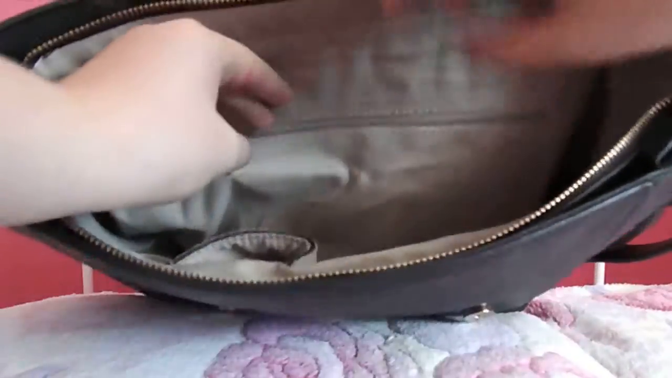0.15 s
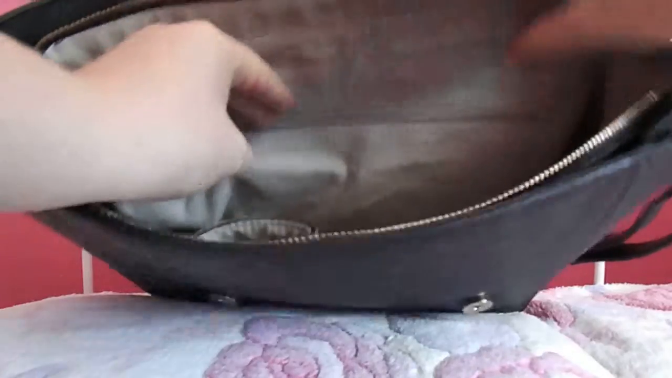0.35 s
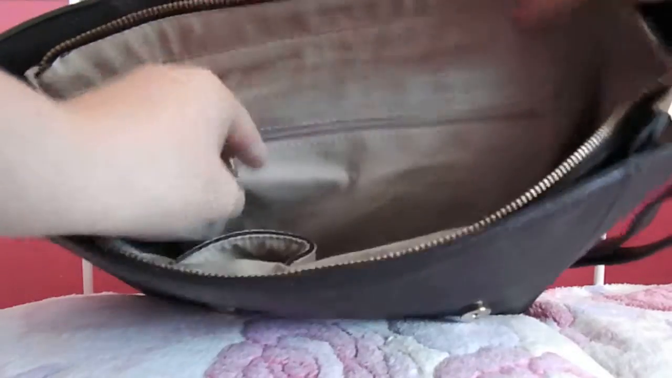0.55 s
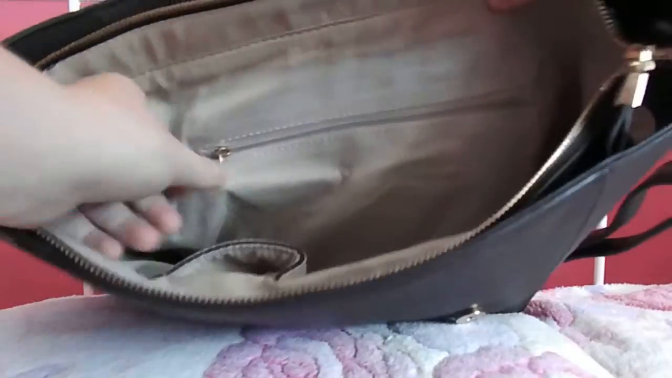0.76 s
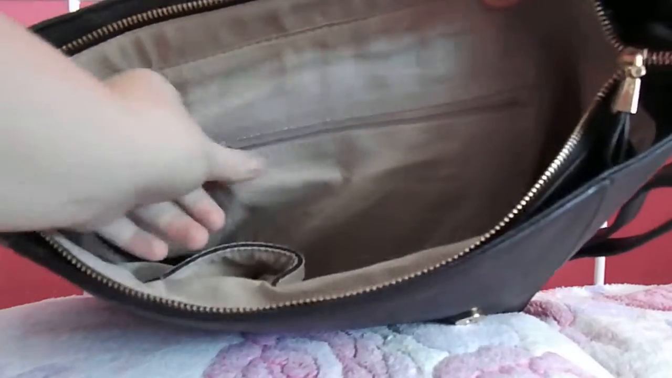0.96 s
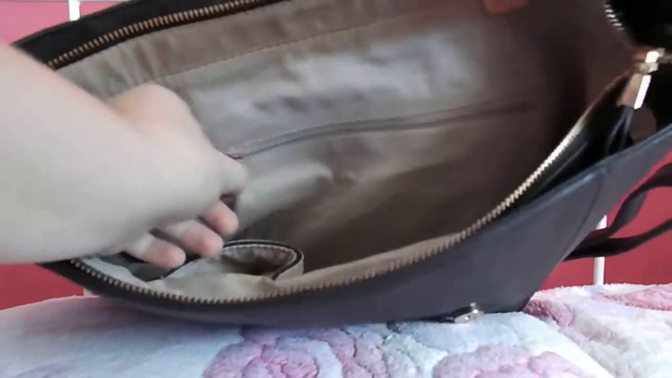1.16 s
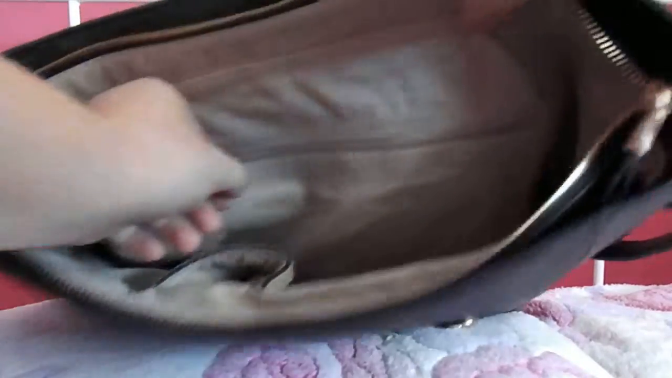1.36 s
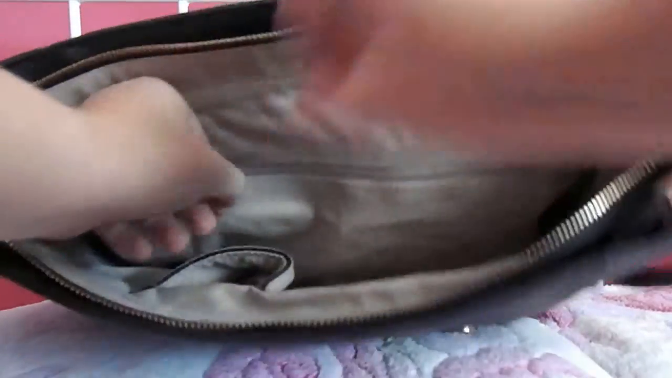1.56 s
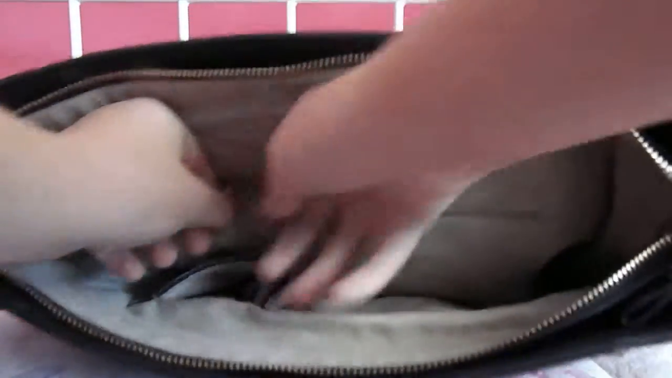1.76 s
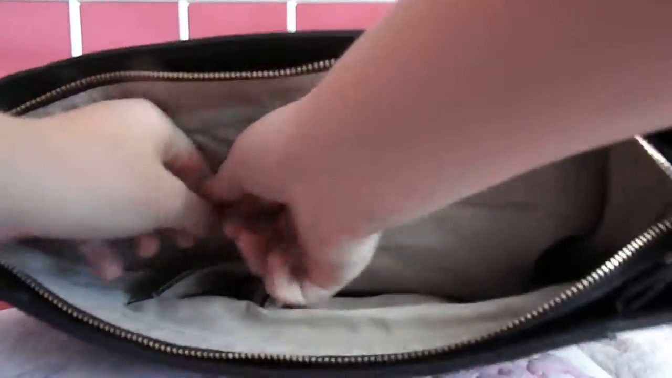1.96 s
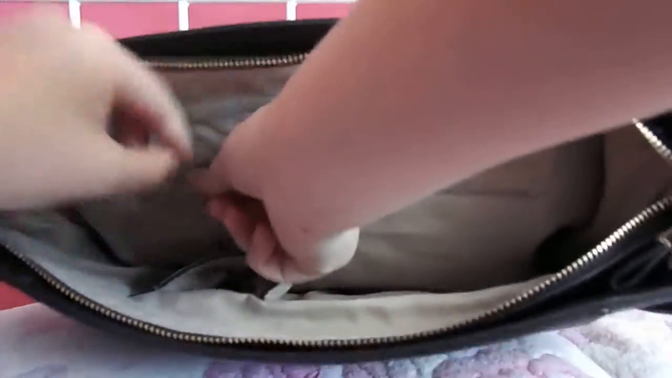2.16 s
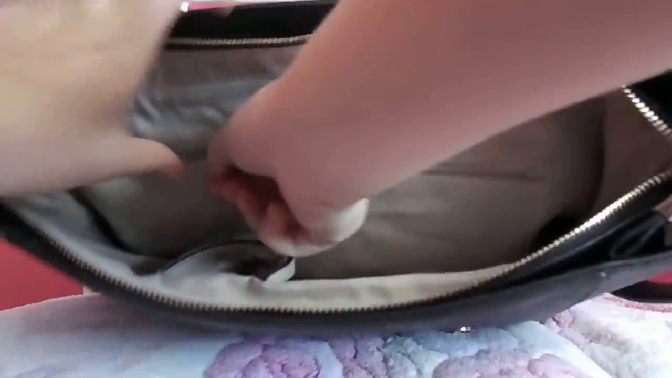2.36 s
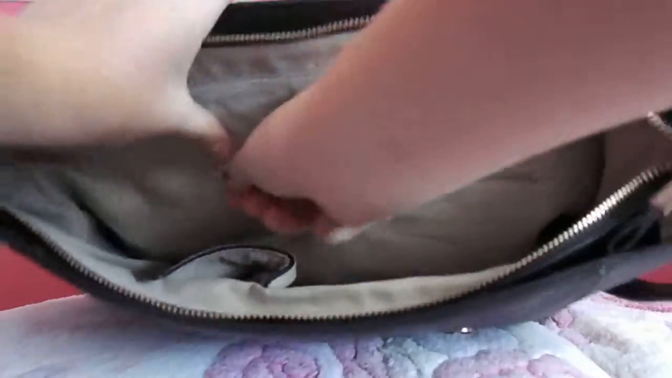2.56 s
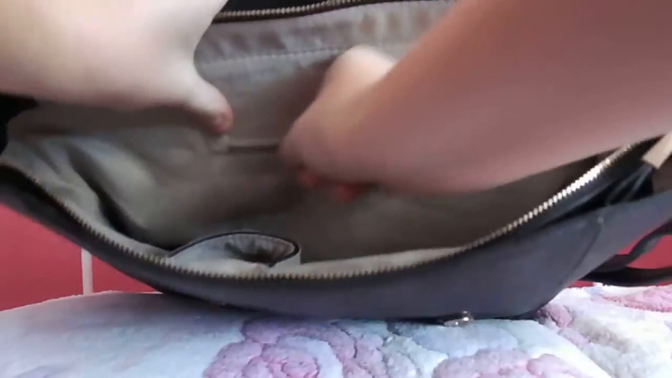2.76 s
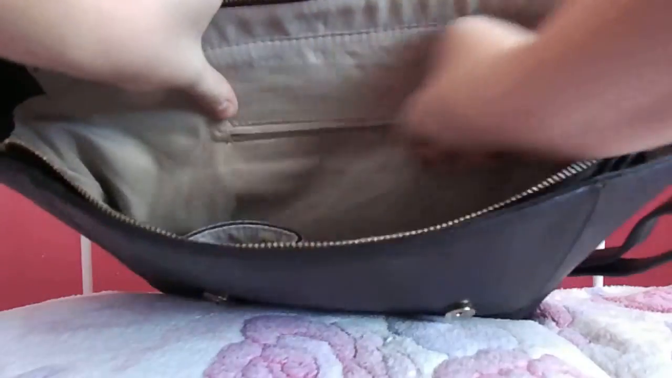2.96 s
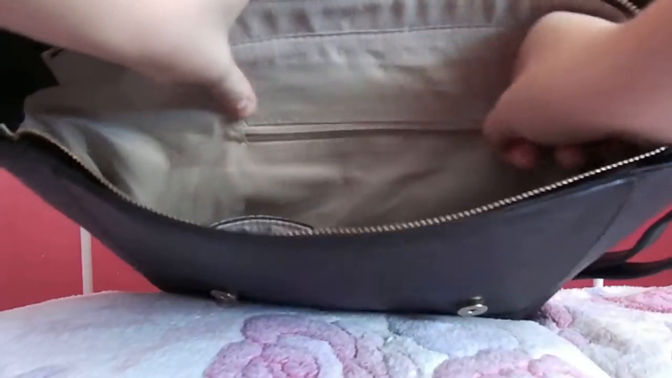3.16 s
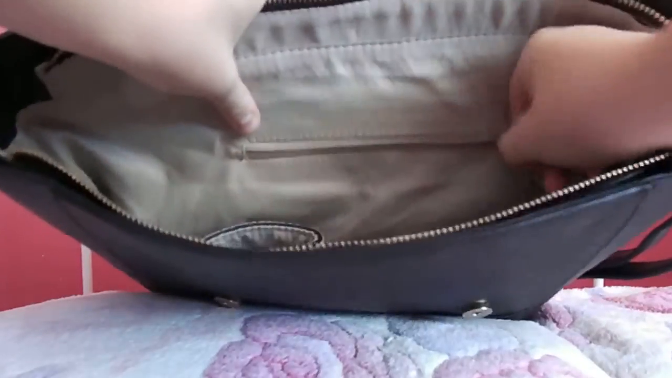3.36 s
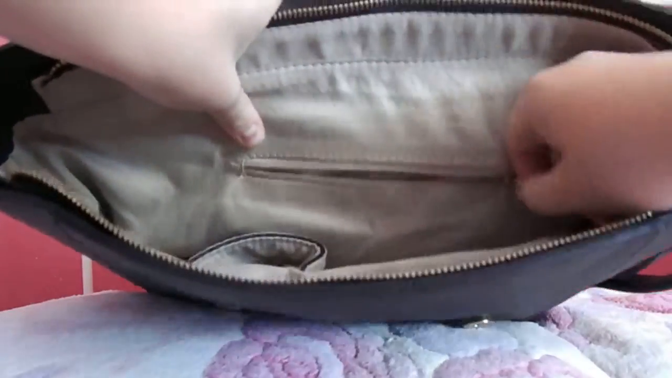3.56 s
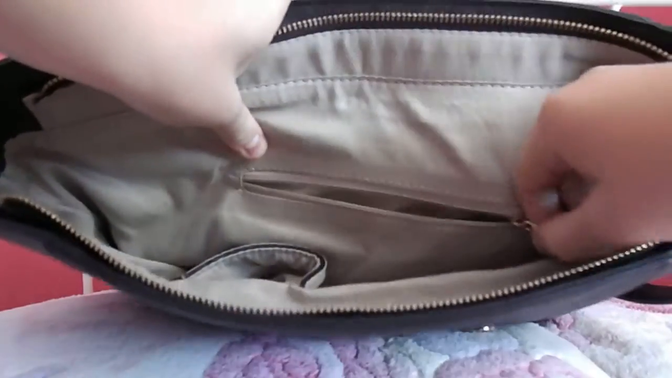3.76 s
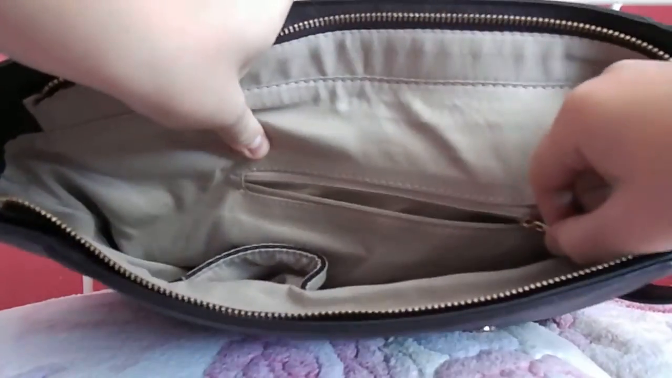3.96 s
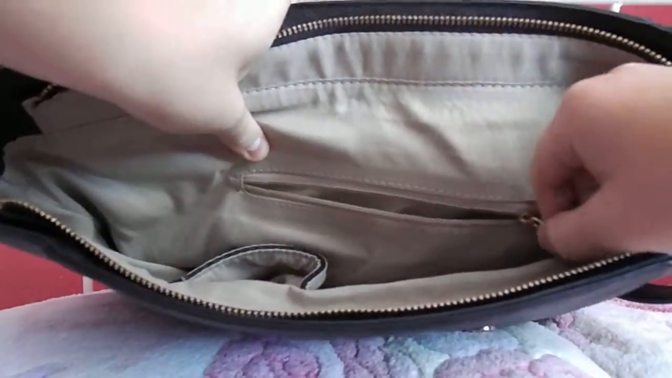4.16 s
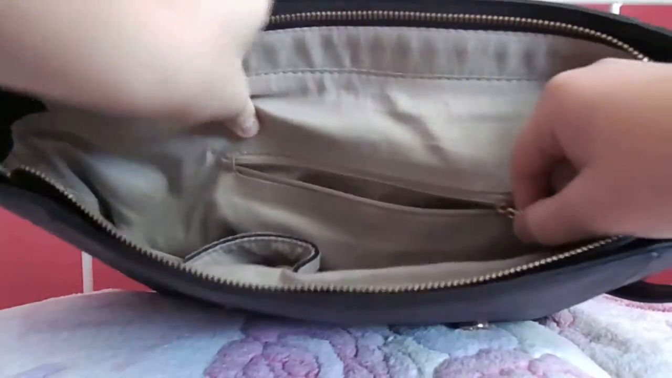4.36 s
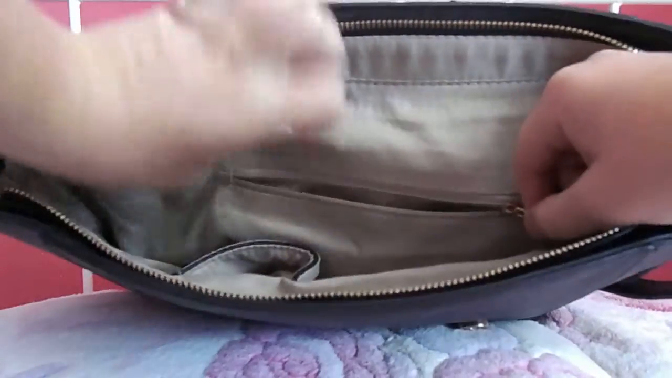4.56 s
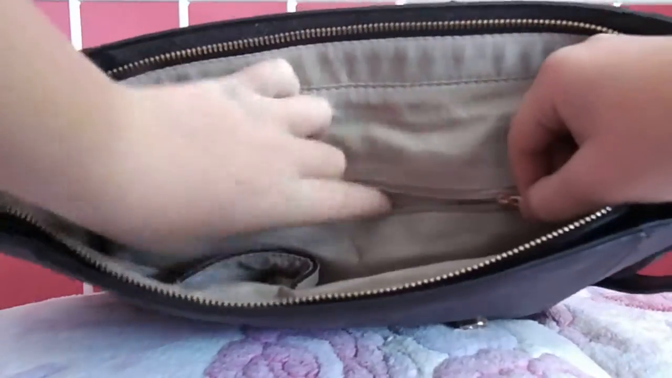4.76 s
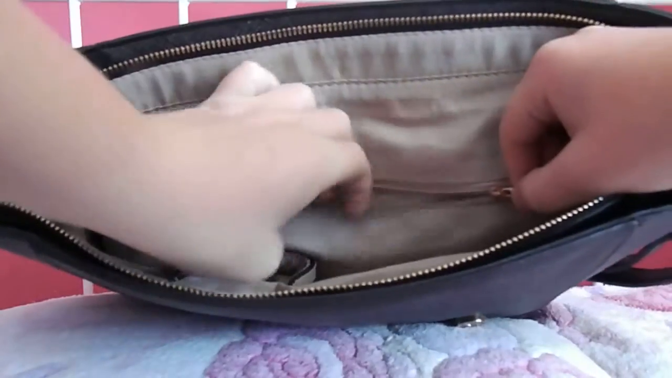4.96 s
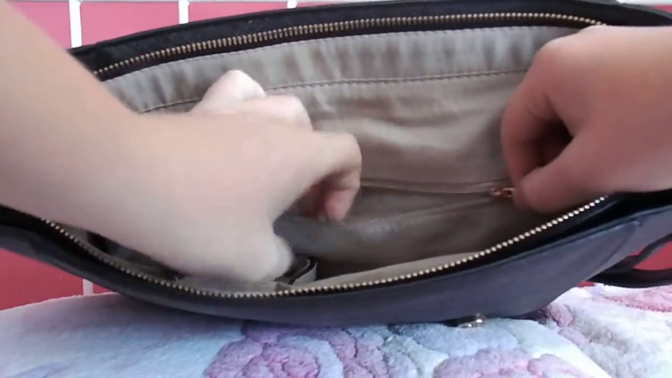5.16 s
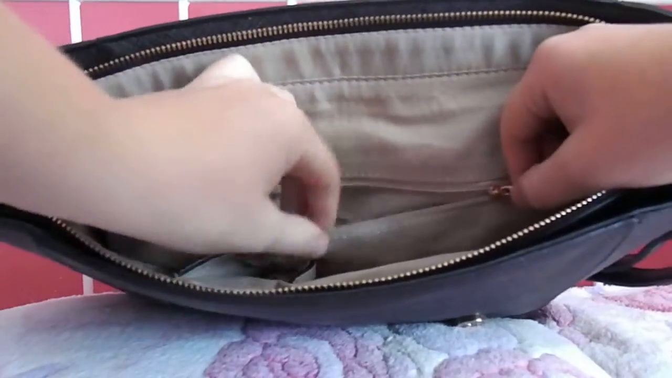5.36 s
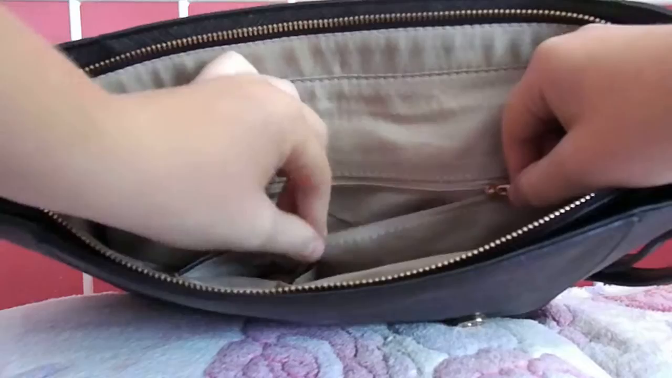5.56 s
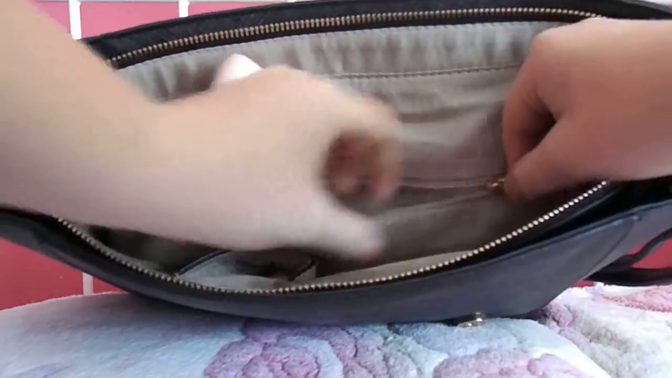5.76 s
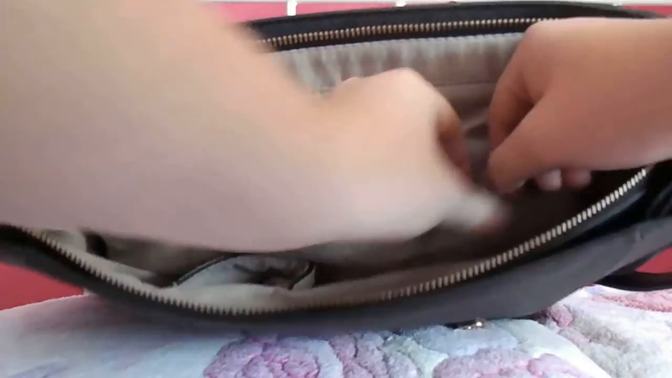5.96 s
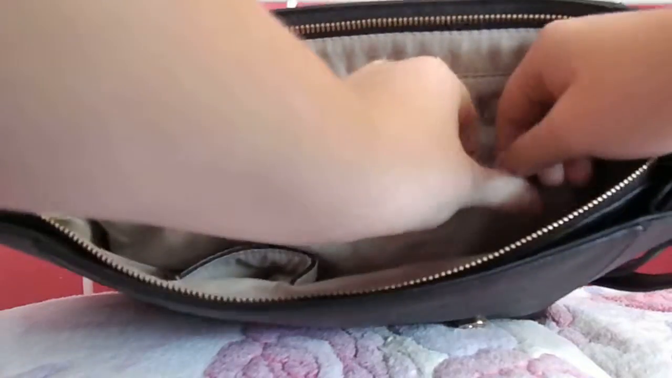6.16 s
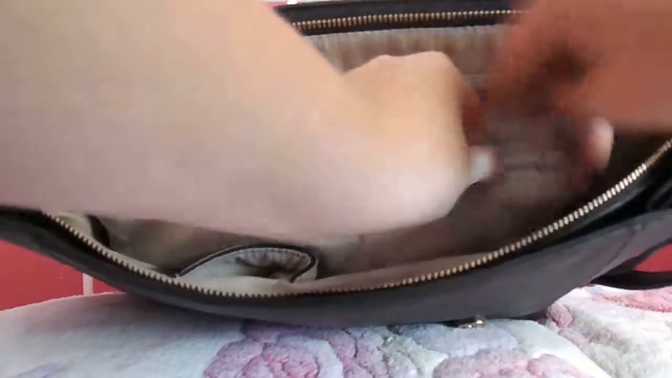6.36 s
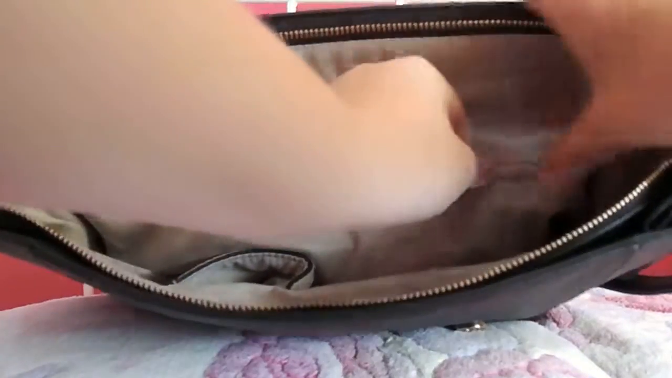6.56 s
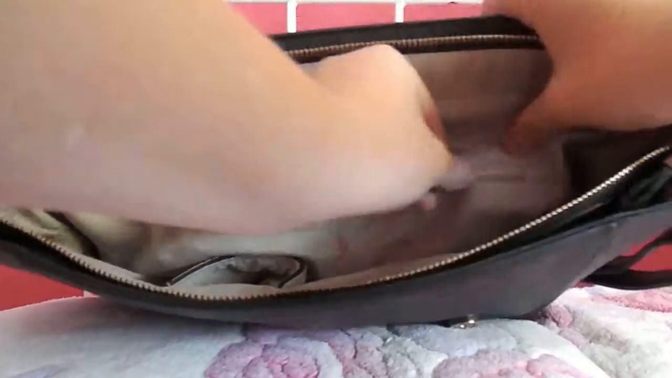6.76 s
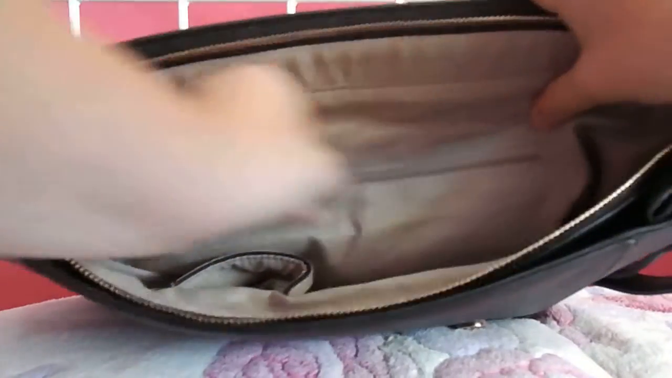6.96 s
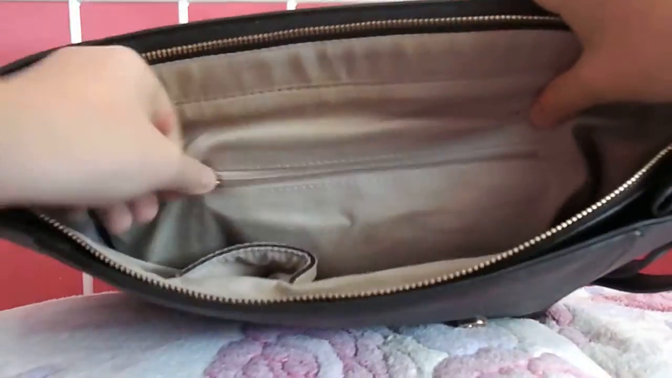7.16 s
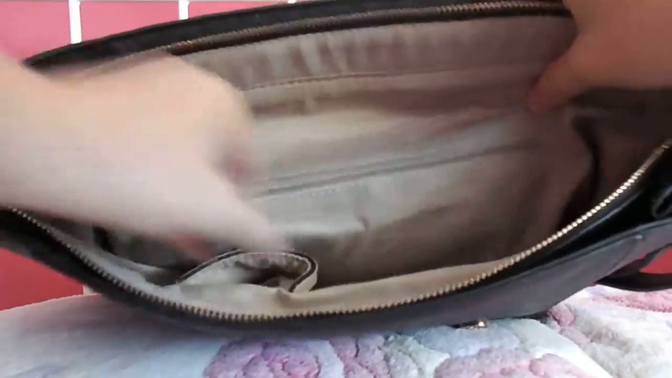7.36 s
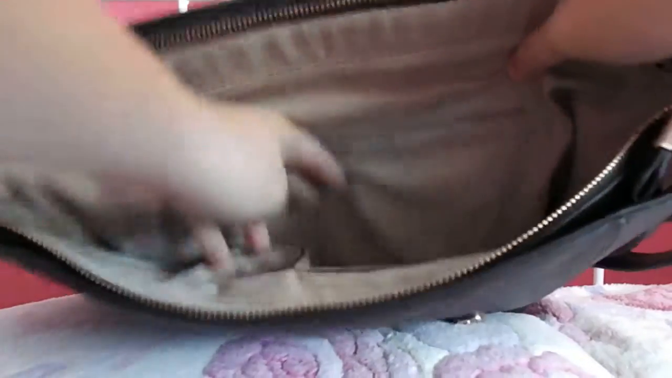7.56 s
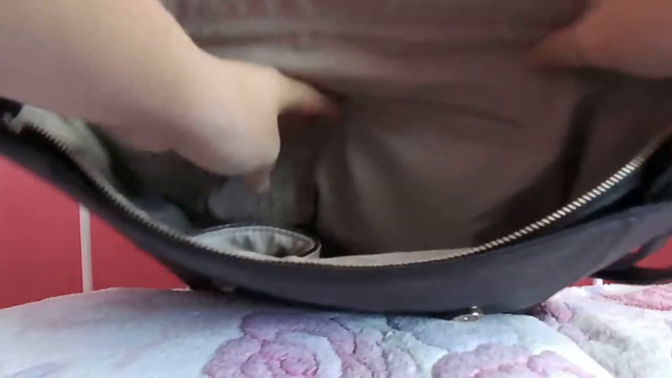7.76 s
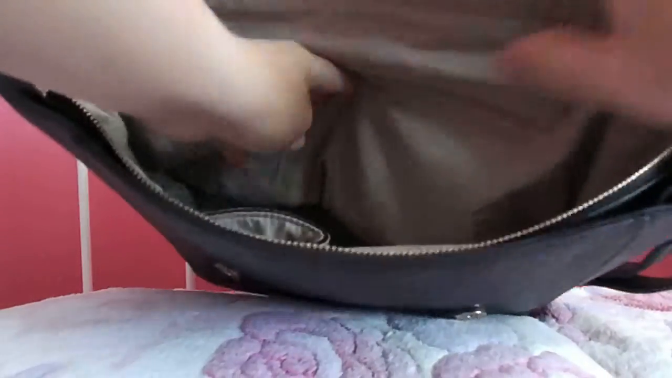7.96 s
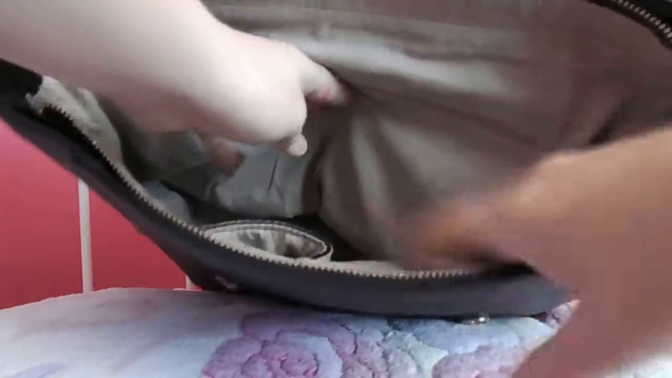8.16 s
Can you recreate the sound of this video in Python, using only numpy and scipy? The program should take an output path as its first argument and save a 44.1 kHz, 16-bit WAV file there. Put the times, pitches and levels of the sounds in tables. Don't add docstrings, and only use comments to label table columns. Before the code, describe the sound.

A close microphone in a small quiet room catches hands inside a fabric-lined handbag, over faint hiss and low room tone. From 0 to 2.5 s the lining rustles in short strokes, soft walls thud, notably near 0.46 and 1.7 s, creases tick, and a tiny metal tab tinkles around 1 and 2 s. At 2.6 s a zipper opens, first tooth by tooth, then a quick scratchy rasp, slowing to stop at 3.05 s. Light rustles and ticks follow. Dull knocks at 4.2 s precede one hard, dry crack at 4.53 s, by far the loudest, with a brief metallic rattle. It is almost still until 5.9 s, when soft bumps return. From 6.77 to 7.05 s the zipper shuts, accelerating and brighter. The tab jingles at 7.3 s, strong muffled thumps come at 7.5 s, then faint rustling to the end.

```python
import sys
import numpy as np
from scipy import signal
from scipy.fft import rfft, irfft, next_fast_len
from scipy.io import wavfile
from scipy.ndimage import uniform_filter1d

SR = 44100
rng = np.random.default_rng(int(sys.argv[2]) if len(sys.argv) > 2 else 0)


def linear_from_db(decibels):
    return 10 ** (np.asarray(decibels, float) / 20)


def transcribe(signal):
    frames = np.atleast_2d(signal).T
    limited = np.clip(frames, -1, 1)
    pcm = np.round(limited * 32767).astype(np.int16)
    wavfile.write(sys.argv[1], SR, pcm)


N = 362590


def in_time(rows):
    s, *columns = np.transpose(rows)
    return [np.interp(np.arange(N) / SR, s, c) for c in columns]


def during(rows):
    t = np.arange(N) / SR
    return np.clip(np.minimum(t - rows[0][0], rows[-1][0] - t) / .003 + 1, 0, 1)


def hump(s, half):
    return np.clip(1 - abs(np.arange(N) / SR - s) / half, 0, 1)


def rms_one(x):
    return x / np.sqrt(np.mean(x ** 2) + 1e-20)


def evened(x, gate):
    return gate * x / np.sqrt(uniform_filter1d(x ** 2, size=1600) + 1e-12)


def colour(x, points):
    hz, db = np.transpose(points)
    size = next_fast_len(N)
    grid = np.maximum(np.arange(size // 2 + 1) * SR / size, 1)
    gain = linear_from_db(np.interp(np.log(grid), np.log(hz), db))
    return irfft(rfft(x, size) * gain, size)[:N]


def drift(rate):
    r = np.exp(-32 * np.pi * rate / SR)
    noise = rng.standard_normal(N // 16 + 1002)
    slow = signal.lfilter([1], [1, -2 * r, r * r], noise)[1000:]
    return np.interp(np.arange(N) / 16, np.arange(len(slow)), rms_one(slow))


def resonate(x, peaks):
    out = 0
    for k, (hz, width, level_db) in enumerate(peaks):
        r = np.exp(-np.pi * width / SR)
        a = [1, -2 * r * np.cos(2 * np.pi * hz / SR), r * r]
        b = np.array([1, 0, -1]) * (1 - r * r) / 2
        out = out + (-1) ** k * linear_from_db(level_db) * signal.lfilter(b, a, x + 1e-18)
    return out


def ring(hz, t60, rise):
    t = np.arange(int(t60 * SR)) / SR
    return np.sin(2 * np.pi * hz * t) * linear_from_db(-60 * t / t60) * (1 - np.exp(-t / rise))


def add(out, s, sound):
    i = max(round(s * SR), 0)
    out[i:i + len(sound)] += sound[:N - i]


EDGE_DB, RISE_SHARE, FLAT_TOP = 13, 1.04, 1.14


def swell(s, length, peak_db):
    late = (np.arange(0, N, 16) / SR - s) / max(length, .01)
    return linear_from_db(peak_db - EDGE_DB * np.maximum(late, -late / RISE_SHARE) ** FLAT_TOP) ** 2


def full(power):
    return np.interp(np.arange(N) / 16, np.arange(len(power)), np.sqrt(power))


# frequency in Hz, density in dB per Hz.
HISS = [(13, -43), (24, -28), (44, -15.5), (160, -1.5), (464, -3), (1250, -12), (5490, -18.5), (15600, -22)]
HISS_DB = -60.5


def hiss():
    return linear_from_db(HISS_DB - 0.43) * rms_one(colour(rng.standard_normal(N), HISS))


# peak time in seconds, length in seconds, peak
# in dB, grain (0 coarse, 1 middling, 2 fine, up to 3 finest).
STROKES = [(0.032, 0.13, -51.5, 2.4), (0.426, 0.2, -58.5, 1.65), (0.537, 0.034, -57.5, 1.6),
           (0.87, 0.063, -60, 1.3), (1.175, 0.16, -57.5, 1.35), (1.327, .03, -55, 2.9),
           (1.382, .11, -53, 2.9), (1.735, 0.041, -54, 1.9), (1.604, 0.17, -85, 0.044),
           (1.739, 0.24, -60.5, 1.05), (1.967, 0.035, -59, 0.72), (2.057, 0.22, -56, 1.47),
           (2.157, 0.035, -55, 2.8), (2.302, 0.061, -62.5, 0.45), (2.492, 0.074, -58, 2.1),
           (2.593, .08, -58.5, 1.9), (3.087, 0.1, -61, 1.5), (3.375, 0.19, -61.5, 2.3),
           (3.77, 0.14, -61.5, 2.7), (4.25, 0.038, -55, 0.46), (4.588, 0.16, -62, 2.9),
           (4.683, 0.062, -57, 1.1), (4.927, 0.43, -68, 0.17), (5.925, 0.06, -62, 1.3),
           (6.31, 0.041, -58.5, 1.55), (6.702, 0.083, -53.5, 1.5), (7.068, 0.11, -54, 1.6),
           (7.292, 0.089, -59, 2.24), (7.43, .06, -59, 1.2), (7.537, .1, -55.5, 1.2),
           (7.613, .05, -60, 1.2), (7.843, 0.12, -60.5, 0.44), (8.21, 0.16, -60.5, 1.1)]
# peak time in seconds, length in seconds, peak in dB.
SHIFTS = [(0.293, 0.79, -59), (1.168, 0.21, -53), (1.38, 0.13, -57.5), (1.625, 0.27, -57.5),
          (1.71, 0.12, -51.5), (1.96, 0.24, -57), (2.201, 0.079, -49), (2.285, 0.028, -45.5),
          (2.5, 0.076, -51.5), (3.064, 0.13, -52), (3.382, 0.12, -55.5), (3.743, 0.098, -56),
          (4.267, 0.059, -52.5), (4.588, 0.35, -60), (6.274, 0.088, -53), (6.712, 0.27, -57),
          (7.084, 0.16, -58), (7.345, 0.085, -57.5), (7.55, 0.2, -50.5), (7.848, 0.044, -50),
          (8.21, 0.16, -58.5)]
# frequency in Hz, density in dB per Hz.
RUMBLE = [(24, -58), (40, -23), (196, -3.5), (409, -7), (958, -13.5), (2000, -22.5), (2600, -101),
          (4400, -120)]
# frequency in Hz, density in dB per Hz.
LOW_RUB = [(800, -60), (1300, -7.5), (2150, -1), (2550, 0), (3000, -3.5), (4500, -49)]
# frequency in Hz, density in dB per Hz.
RUB = [(2200, -27), (3200, 4.5), (4000, 3.5), (5500, 1.5), (7000, -3), (9500, -57)]
# frequency in Hz, density in dB per Hz.
FINE = [(3500, -33), (6000, -5), (9000, 0), (13000, -2.5), (16000, -4)]
# levels in dB of rumble, low rub, rub and fine rub.
REST_DB = (-63.5, -73.5, -78.5, -70)
GRAIN_FOCUS_DB = 2


def lining():
    strokes = np.array([swell(*row[:3]) for row in STROKES])
    grain = np.array(STROKES)[:, 3]
    powers = [sum(swell(*row) for row in SHIFTS)]
    for k in range(3):
        powers.append(linear_from_db(-GRAIN_FOCUS_DB * (grain - k) ** 2) ** 2 @ strokes)
    spectra, crackles = (RUMBLE, LOW_RUB, RUB, FINE), (0.49, 0.76, 0.33, 0.26)
    shared, out = drift(13.0), 0
    for power, rest_db, points, crackle in zip(powers, REST_DB, spectra, crackles):
        slips = rng.random(N) < 500 / SR
        sizes = linear_from_db(5.3 * np.minimum(rng.exponential(1, N), 3))
        grains = slips * sizes * rng.choice([-1, 1], N)
        noise = rng.standard_normal(N) + crackle * rms_one(grains)
        gain = full(power + linear_from_db(rest_db) ** 2)
        flicker = linear_from_db(-3.0 + 1.6 * shared + 2.44 * drift(30.5))
        out = out + gain * flicker * rms_one(colour(noise, points))
    return out


# start in seconds, level in dB,
# frequency in Hz, time to fall 60 dB in seconds.
KNOCKS = [(0.121, -40, 430, 0.021), (0.273, -36, 1660, 0.0063), (1.184, -38, 260, 0.038),
          (1.335, -36, 1550, 0.014), (1.7137, -33.5, 610, 0.034), (2.203, -33, 380, 0.015),
          (2.2, -38.5, 260, 0.059), (2.238, -26, 390, 0.0094), (2.288, -48, 1200, 0.013),
          (2.56, -36, 107, 0.086), (2.486, -30.5, 1530, 0.0035), (3.936, -46, 1700, 0.015),
          (4.233, -33, 120, 0.023), (4.235, -40.5, 857, 0.048), (4.236, -40, 190, 0.065),
          (3.36, -49.5, 600, 0.13), (7.43, -50, 680, .04), (5.93, -47.5, 122, .1), (7.499, -41, 1730, .012),
          (7.519, -30.5, 980, 0.021), (7.555, -48, 2600, .03), (6.626, -44, 180, 0.051),
          (7.53, -40, 220, .06), (6.305, -46.5, 1650, 0.033), (6.836, -34.5, 1200, 0.07),
          (7.008, -31.5, 741, 0.035), (7.01, -41, 1400, .04), (7.022, -38, 1500, 0.034),
          (7.045, -49, 612, 0.49), (6.944, -42, 1210, .06), (2.614, -43, 450, 0.12),
          (7.819, -48, 104, 0.11), (7.289, -41.5, 2600, 0.016), (7.289, -44, 4030, 0.015),
          (0.98, -37, 2860, 0.0052), (7.529, -34, 152, 0.11)]


def knocks():
    out = np.zeros(N)
    for s, level_db, hz, t60 in KNOCKS:
        add(out, s, linear_from_db(level_db) * ring(hz, t60, 0.49 / hz))
    return out


# peak time in seconds, peak in dB, frequency in Hz.
THUDS = [(0.166, -35, 196), (0.2711, -39.5, 258), (0.4462, -34.5, 332), (0.4576, -25.5, 242),
         (1.1235, -37.5, 483), (1.3364, -35.5, 604), (1.3405, -35.5, 330), (1.7157, -28.5, 400),
         (2.187, -33, 236), (2.278, -34.5, 310), (2.475, -33.5, 210), (2.494, -34, 298), (4.237, -28, 610),
         (4.461, -34.5, 505), (4.4863, -30, 267), (4.4957, -31.5, 207), (5.943, -41, 296),
         (6.243, -37, 366), (6.2925, -36, 348), (6.4075, -38, 606), (6.6335, -33, 212),
         (6.7391, -32.5, 364), (6.7546, -34, 330.0), (7.2926, -44, 380.0), (7.501, -33.5, 380.0),
         (7.5206, -23, 524), (7.532, -22.5, 407), (7.5966, -33, 337), (7.8226, -36, 590), (8.176, -43, 297),
         (0.374, -41, 220), (0.48, -39, 210), (6.61, -44, 190), (6.648, -43, 230), (6.665, -44, 420),
         (7.3495, -41, 523), (7.415, -46, 380), (7.435, -47, 250), (7.54, -34, 260), (7.557, -40, 240),
         (7.646, -40, 600), (2.259, -41, 230), (2.282, -35, 420)]


def thuds():
    out, chance = np.zeros(N), rng.uniform(0, 1, (len(THUDS), 2))
    for (s, peak_db, hz), (a, b) in zip(THUDS, chance):
        low = ring(0.95 * hz, 4.0 / hz, 0.43 / hz)
        overtone = ring((1.44 + a) * hz, 1.13 / hz, 0.00014) * np.sign(b - .5)
        add(out, s - 0.61 / hz, 2.08 * linear_from_db(peak_db) * low)
        add(out, s - 0.402 / hz, 1.07 * linear_from_db(peak_db) * overtone)
    return out


# time in seconds, peak in dB, centre in
# Hz.
TICKS = [(0.2754, -43, 2300), (0.4523, -50, 2900), (.5503, -42, 11000), (0.8673, -54, 6800),
         (1.057, -42, 9000), (1.0575, -49, 2800), (1.199, -50, 7200), (1.335, -50, 2080),
         (1.922, -43, 8100), (1.9316, -51, 6600), (1.951, -45, 10900), (1.9595, -45, 8900),
         (2.489, -50.5, 1900), (2.107, -49, 5340), (2.1629, -47.5, 4400), (2.2872, -50, 2600),
         (2.6, -56, 3500), (3.0567, -44, 4200), (3.069, -46, 3606), (3.088, -45, 4030), (3.1912, -50, 4830),
         (3.8056, -48, 4800), (3.937, -47, 4800), (6.2403, -48.5, 7000), (6.311, -51.5, 9700),
         (6.697, -48, 8700), (6.7516, -52, 4650), (7.144, -47, 4750), (7.2917, -51, 8500),
         (7.3524, -46.5, 7300), (7.8189, -41, 1940), (0.268, -53, 1300), (0.4855, -55, 1800),
         (1.485, -55, 2500), (1.532, -53.5, 3500), (1.708, -59, 8000), (1.8072, -55, 7500),
         (1.9043, -57, 5000), (2.478, -55, 2000), (3.0952, -50, 5000), (3.085, -51, 3500),
         (4.459, -58.5, 1800), (4.482, -50, 2000), (6.626, -52.5, 900), (6.646, -58, 2498),
         (6.736, -52, 2200), (7.3065, -51, 3500), (7.528, -53, 6000), (7.5315, -56, 4000),
         (7.546, -56, 3800), (7.550, -53, 7000), (7.582, -58, 3000), (7.646, -56, 3300), (7.651, -58, 3500),
         (7.822, -58, 13000)]


def ticks():
    out, t = np.zeros(N), np.arange(400) / SR
    white = rng.standard_normal((len(TICKS), 400))
    white[:, 0] = 1.5
    for (s, peak_db, hz), noise in zip(TICKS, white):
        band = [(hz, 1.25 * hz, 0)]
        burst = resonate(resonate(noise * np.exp(-t / 0.0011), band), band)
        add(out, s - .0008, 1.08 * linear_from_db(peak_db) * burst / np.sqrt(np.mean(burst[:50] ** 2)))
    return out


# peak time in seconds, length in seconds, peak in dB, frequency in Hz, width in Hz.
SWISHES = [(1.63, 0.15, -62.5, 2440, 650), (2.737, 0.097, -55, 137, 60), (4.686, 0.032, -62, 5160, 300),
           (6.977, 0.064, -46, 4300, 900), (7.904, 0.011, -55.5, 2730, 704), (0.39, .1, -64.5, 3500, 1200),
           (1.4, .05, -65, 2450, 400), (0.57, 0.022, -64, 3700, 1500), (1.84, .06, -62, 4300, 900),
           (7.835, .04, -63, 13000, 3400)]


def swishes():
    out, white = np.zeros(N), rng.standard_normal((len(SWISHES), SR))
    for (s, length, db, hz, width), noise in zip(SWISHES, white):
        i = max(round((s - .5) * SR), 0)
        gain = full(swell(s, length, db))[i:i + SR]
        band = [(hz, width, 0)]
        song = rms_one(resonate(resonate(noise, band), band))
        add(out, i / SR, gain * song[:len(gain)])
    return out


# time in seconds, upper ring in dB, lower ring in dB.
JINGLES = [(0.9792, -39, -57), (.99, -50, -70), (1.024, -43, -70), (1.036, -50, -75), (1.0525, -44, -75),
           (1.0665, -52, -70), (1.9516, -51, -42), (1.9584, -47, -52), (1.9707, -37, -45.5),
           (2.0363, -42, -50), (7.289, -34, -52), (7.2984, -49, -51), (7.3154, -61, -56),
           (7.3304, -56, -52), (7.3064, -48, -63), (7.3482, -59, -50), (7.4694, -38, -56),
           (7.4764, -43, -62)]
# frequency in Hz, time to fall 60 dB in seconds.
TAB = [(11260, 0.025), (11370, 0.067), (14350, 0.016), (14800, 0.017)]


def tab():
    out, chance = np.zeros(N), rng.normal(0, 3.4, (len(JINGLES), 4))
    fade = np.exp(-np.arange(199) / (0.0011 * SR))
    clicks = np.diff(rng.standard_normal((len(JINGLES), 200))) * fade
    for (s, high_db, low_db), spread_db, click in zip(JINGLES, chance, clicks):
        add(out, s, linear_from_db(high_db - 7.0) * click)
        levels_db = np.array([low_db, low_db - 24, high_db - 5, high_db - 10]) + spread_db
        for (hz, t60), level_db in zip(TAB, levels_db):
            add(out, s, linear_from_db(level_db + 5.5) * ring(hz, t60, .0007))
    return out


# time in seconds, teeth per second, unevenness 0-1, force in dB.
OPENING = [(2.599, 200, 0.38, -50.5), (2.655, 178.4, 0.23, -46.5), (2.685, 93.6, 0.29, -51.5),
           (2.755, 219.9, 0.18, -45.5), (2.80, 324.4, 0.18, -45.5), (2.85, 401.4, 0.26, -44),
           (2.92, 404.3, .35, -40.5), (2.995, 320, 0.34, -43), (3.05, 289.5, 0.3, -55)]
# time in seconds, teeth per second, unevenness 0-1, force in dB.
CLOSING = [(6.769, 235.2, 0.099, -52), (6.822, 299.6, 0.24, -45), (6.857, 444.3, 0.092, -47),
           (6.875, 475, .1, -46), (6.903, 472, 0.14, -42.5), (6.95, 609, .07, -41),
           (7.007, 618, 0.052, -38.5), (7.028, 674.3, 0.11, -43.5), (7.047, 660, 0.5, -49.5)]
# time in seconds, extra level in dB.
CREEP = [
    [(2.599, -2), (2.6028, -2), (2.611, -4), (2.6158, 1), (2.6202, -3), (2.6243, 1), (2.6347, 3),
     (2.6415, -1), (2.6462, 0), (2.6532, -4), (2.6581, 0), (2.6695, 3), (2.6783, -2), (2.6873, -2),
     (2.700, 1), (2.7069, 3), (2.7142, 1), (2.7221, 0), (2.7297, 2), (2.7355, -2), (2.7386, -4),
     (2.7434, 0), (2.749, 3), (2.7545, -1), (2.7578, -1), (2.761, -4), (2.7662, 5), (2.7695, 2),
     (2.7735, -4), (2.7784, 5), (2.7824, 0), (2.7858, 0), (2.7909, 4), (2.7935, 2), (2.7965, 4),
     (2.998, -2), (3.0027, 5), (3.0084, 2), (3.0137, -1), (3.0175, 3), (3.0264, 2), (3.0292, 1),
     (3.0352, -5), (3.0378, -1), (3.0442, 5), (3.0468, -2)],
    [(6.769, 4), (6.7738, -2), (6.7785, -3), (6.7845, 1), (6.7885, 1), (6.7953, -3), (6.7998, -1),
     (6.8095, 1), (6.8135, -2), (6.8183, -1), (6.8215, 1), (6.8265, -4), (6.8311, -1)],
]
# frequency in Hz, width in Hz, level in dB.
BAG = [
    [(352, 463, 4.5), (519, 204, 9.5), (638, 60, 4.5), (1200, 86, -6)],
    [(247, 164, 2.5), (477, 60, 7.5), (609, 33, 5.5), (1044, 340, 0.5), (1200, 90, 0.5)],
]
# frequency in Hz, width in Hz, level in dB.
SLIDER = [
    [(1970, 210, -9.5), (2600, 177, -19), (3500, 760, -13), (4840, 400, -16.5), (6000, 320, -14),
     (7170, 320, -20), (8300, 500, -20.5), (13000, 6200, -20.5)],
    [(1550, 220, -3.5), (2600, 500, -9), (3810, 500, -8), (4650, 480, -12), (6300, 1700, -12.5),
     (3150, 250, -12), (8400, 920, -12), (10100, 710, -15), (13000, 3800, -15)],
]
# frequency in Hz, density in dB per Hz.
TEETH = [(710, -45), (1200, 1.5), (1510, -9.5), (2010, -4), (3890, -4), (15800, -10.5)]
# time in seconds, extra level in dB, half
# length in seconds.
WALL_SWELLS = [(2.615, 7, 0.044), (2.824, 6, 0.051), (6.789, 8.5, 0.051), (6.859, 9, 0.024),
               (7.006, 12, 0.0088)]
# time in seconds, half length in seconds, extra level in dB, resonance by letter in table order.
GRIP = [(2.625, .04, 9, "e"), (2.76, 0.054, 7, "e"), (2.86, .04, 6, "e"), (2.99, .04, 4, "e"),
        (2.775, .04, 5, "c"), (2.935, .06, 9, "c"), (2.91, 0.081, 8, "d"), (2.76, .03, -10, "d"),
        (2.715, .03, 4, "a"), (2.93, .06, 9, "a"), (2.74, .03, 6, "b"), (2.86, 0.044, 13, "f"),
        (2.79, .04, 7, "g"), (6.80, .04, 11, "c"), (6.92, .05, 7, "d"), (6.975, 0.048, 9, "c"),
        (6.97, 0.02, 2, "b"), (6.90, .05, 5, "e"), (7.02, .03, 10, "e"), (6.82, .025, 14, "f")]
CREEP_REACH_S = .0065
WALL_DB, SCRAPE, SCRAPE_PER_UNEVEN = -1, 0.0015, 0.46
SLIDER_RING, RING_WANDER_DB = 7, 1.5


def pull(motion, creep, bag, slider):
    rate, uneven, teeth_db = in_time(motion)
    gate, t = during(motion), np.arange(N) / SR
    body_db = teeth_db + WALL_DB + sum(db * hump(s, half) for s, db, half in WALL_SWELLS)

    moving = (t > motion[0][0]) * gate
    speed = moving * rate * np.exp(0.49 * uneven * drift(120))
    passed = np.cumsum(speed) / SR + (moving > 0)
    hit = np.diff(np.floor(passed), prepend=0) > 0
    creep_db, free = np.zeros(N), np.ones(N)
    for s, extra_db in creep:
        hit[round((s - CREEP_REACH_S) * SR):round((s + CREEP_REACH_S) * SR)] = False
        creep_db[round(s * SR)] = extra_db
        free[round(s * SR)] = 0
    hit[free == 0] = True

    tooth = np.cumsum(hit)
    chance = rng.standard_normal((600, 1 + len(slider)))[tooth].T
    side_db = 0.31 * (-1) ** tooth
    kicks = hit * linear_from_db(creep_db + 9.7 * free * uneven * chance[0] + side_db)

    white = rng.standard_normal((2, N))
    decay = np.exp(-1 / (0.0013 * SR))
    bursts = evened(signal.lfilter([1], [1, -decay], kicks + 1e-18), gate)
    scratch = white[0] * (bursts + SCRAPE * rate + SCRAPE_PER_UNEVEN * uneven)
    rings, on = np.zeros(N), gate > 0
    for name, peak, own in zip("abcdefghi", slider, chance[1:]):
        freed_db = sum(db * hump(s, half) for s, half, db, which in GRIP if which == name)
        ring_db = 2.1 * own + freed_db + RING_WANDER_DB * drift(5.9)
        rings[on] += resonate((scratch * linear_from_db(ring_db))[on], [peak])
    teeth = colour(scratch + SLIDER_RING * rings, TEETH)

    body = evened(resonate(kicks, bag), gate) + 3.8 * uneven * rms_one(resonate(white[1], bag))
    return linear_from_db(body_db) * evened(body, gate) + linear_from_db(teeth_db) * evened(teeth, gate)


# time in seconds, ring in dB.
RATTLES = [(4.5273, -36), (4.536, -31), (4.5455, -36), (4.5565, -41), (4.5605, -41), (4.567, -45),
           (4.575, -45), (4.6, -52)]
# frequency in Hz, level in dB, time to fall 60 dB in seconds.
STUD = [(2950, -8, .018), (9800, -9, .03), (10000, -15, .06), (10460, -7, .05), (10250, -6, .025),
        (12600, -13, .022), (13650, -14, .03), (15000, -12, .02)]
# frequency in Hz, width in Hz, level in dB.
CRACK = [(330, 320, -6.5), (670, 360, -1.5), (1640, 510, -1), (2900, 600, -2.5), (6000, 5300, -15),
         (10110, 530, 1), (11470, 760, -9), (13760, 1200, -7), (15400, 300, -3), (15700, 400, -12)]
SNAP_S, SNAP_PEAK_DB = 4.52742, -8.3


def stud():
    out, click = np.zeros(N), np.zeros(900)
    chance = rng.normal(0, 1.7, (len(RATTLES), len(STUD)))
    t = np.arange(SR // 8) / SR
    noise = rng.standard_normal(len(t))
    click[0] = 1
    splinter = click + 0.088 * noise[:900] * np.exp(-t[:900] / 0.0017)
    crack = resonate(splinter, CRACK[:3]) + resonate(splinter, CRACK[3:])
    add(out, SNAP_S, linear_from_db(SNAP_PEAK_DB) * crack / np.max(np.abs(crack)))
    add(out, SNAP_S + 0.0056, linear_from_db(-43.0) * noise * np.exp(-t / 0.024))
    grits = rng.standard_normal((len(RATTLES), 400)) * np.exp(-t[:400] / 0.0018)
    for (s, ring_db), spreads_db, grit in zip(RATTLES, chance, grits):
        add(out, s, linear_from_db(ring_db - 5.0) * resonate(grit, CRACK[2:]))
        for (hz, level_db, t60), spread_db in zip(STUD, spreads_db):
            add(out, s, linear_from_db(ring_db + level_db + spread_db) * ring(hz, t60, 0.00072))
    return out


# time in seconds, pitch in Hz, level in dB.
SQUEAK = [(4.6, 2620, -74), (4.655, 2730, -67), (4.72, 2500, -72), (4.80, 2560, -74), (4.86, 2700, -71),
          (4.932, 2950, -68), (5.04, 2560, -74), (5.12, 2500, -81), (5.4, 2510, -79)]


def squeak():
    hz, level_db = in_time(SQUEAK)
    level = np.sqrt(2) * linear_from_db(level_db + 3.5 * drift(25))
    phase = 2 * np.pi * np.cumsum(hz + 25 * drift(60)) / SR
    return during(SQUEAK) * level * np.sin(phase)


ROOM_T60_S, ROOM_CUT_HZ, ROOM_DB = 0.45, 9000, -17


def room(x):
    t = np.arange(int(ROOM_T60_S * SR)) / SR
    tail = rng.standard_normal(SR)[:len(t)] * linear_from_db(-60 * t / ROOM_T60_S) * (t > .003)
    tail = signal.lfilter(*signal.butter(1, ROOM_CUT_HZ, fs=SR), tail)
    return linear_from_db(ROOM_DB) * signal.fftconvolve(x, tail / np.sqrt(np.sum(tail ** 2)))[:N]


BAG_LOW_HZ = 89


def scene():
    zipper = sum(map(pull, (OPENING, CLOSING), CREEP, BAG, SLIDER))
    hits = knocks() + thuds() + ticks() + tab() + zipper + stud()
    hits = signal.sosfilt(signal.butter(2, BAG_LOW_HZ, "high", fs=SR, output="sos"), hits)
    mono = hits + room(hits) + hiss() + lining() + swishes() + squeak()
    return np.array([mono, mono])


def low_pass(x):
    return signal.sosfilt(signal.butter(12, 17100, fs=SR, output="sos"), x)


CUTOFF_HZ = 15850


def record(dry):
    top_cut = signal.ellip(10, .3, 70, CUTOFF_HZ, fs=SR, output="sos")
    return low_pass(signal.sosfilt(top_cut, dry))


dry = scene()
out = record(dry)
transcribe(out)
```